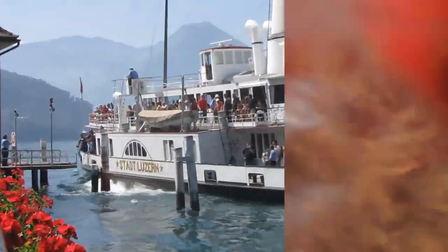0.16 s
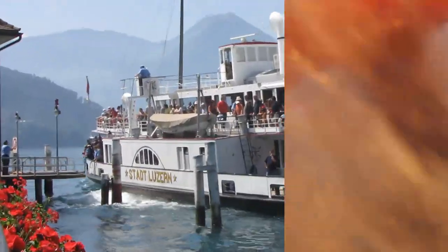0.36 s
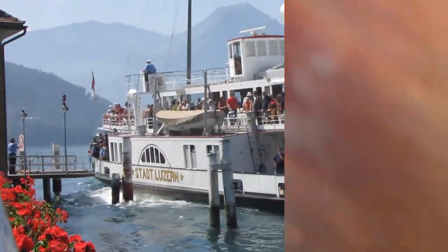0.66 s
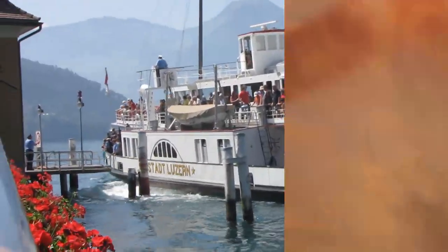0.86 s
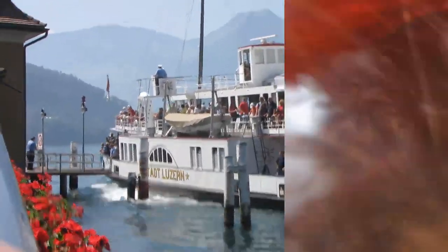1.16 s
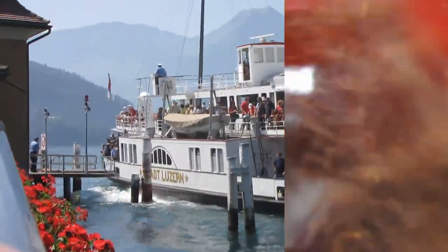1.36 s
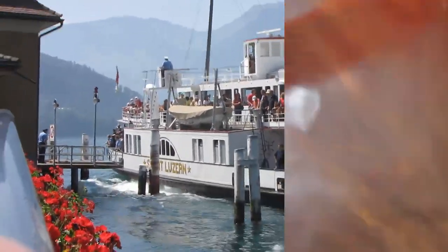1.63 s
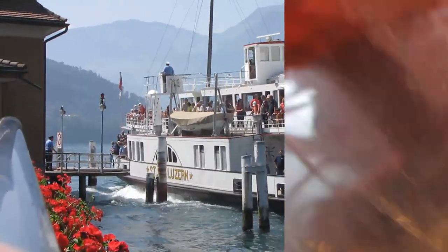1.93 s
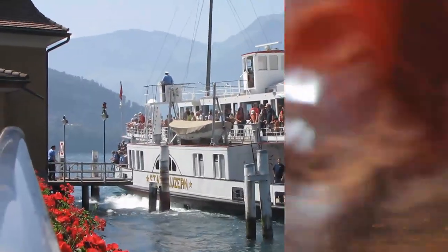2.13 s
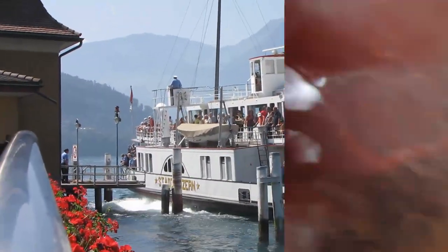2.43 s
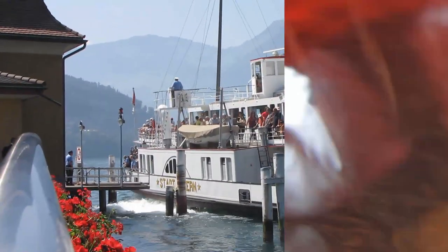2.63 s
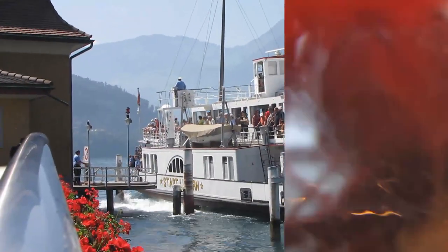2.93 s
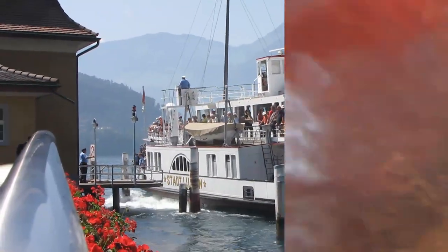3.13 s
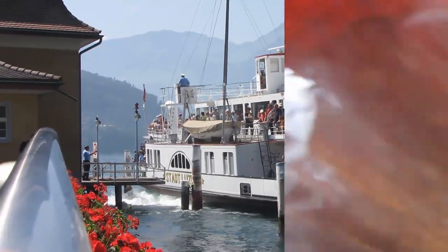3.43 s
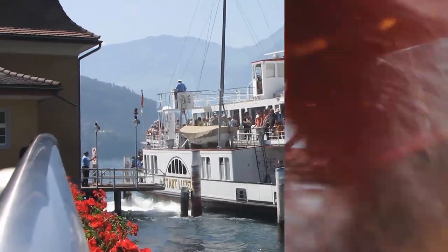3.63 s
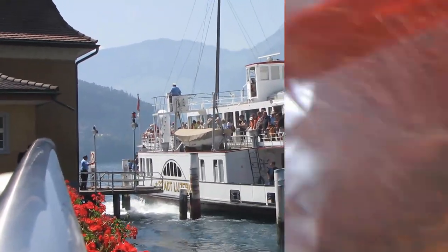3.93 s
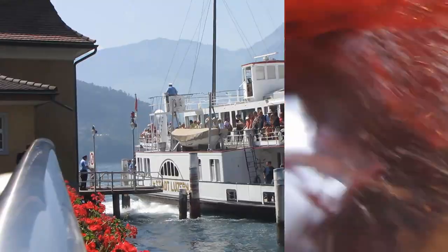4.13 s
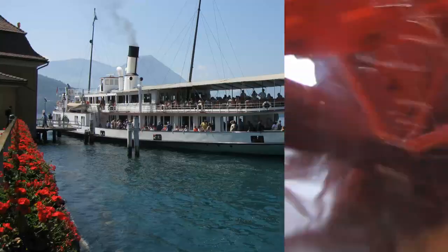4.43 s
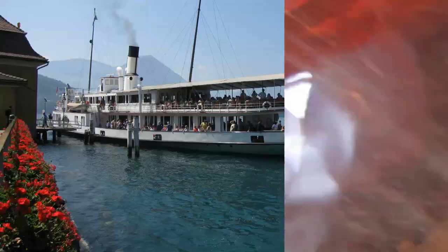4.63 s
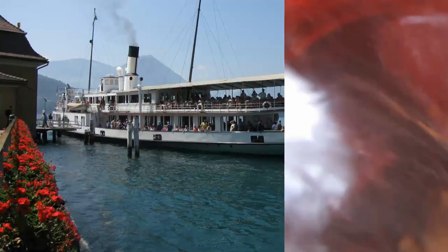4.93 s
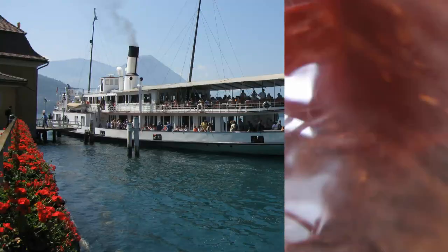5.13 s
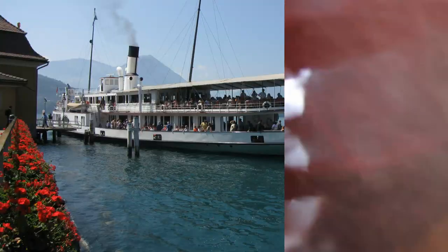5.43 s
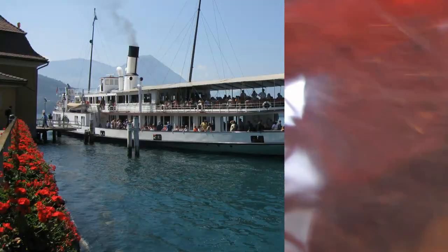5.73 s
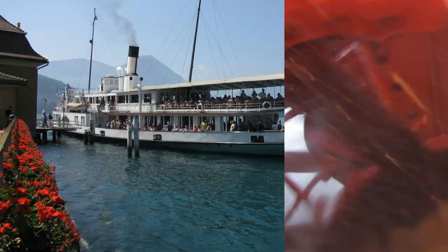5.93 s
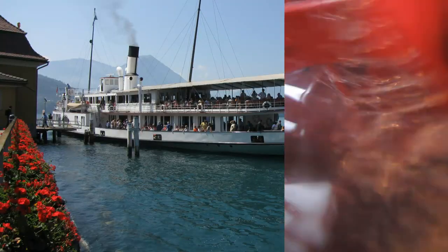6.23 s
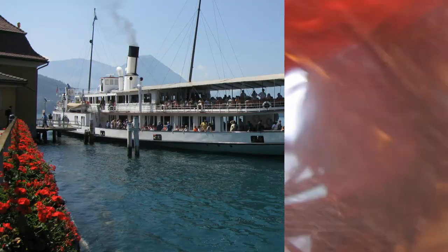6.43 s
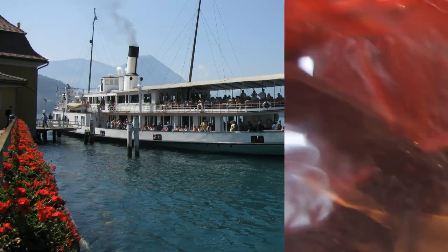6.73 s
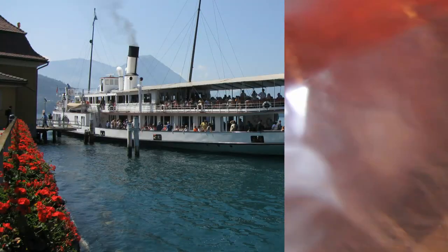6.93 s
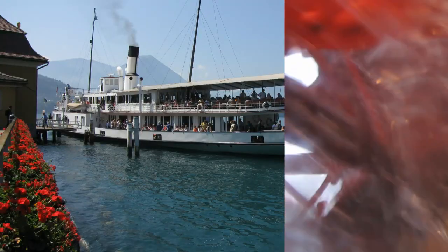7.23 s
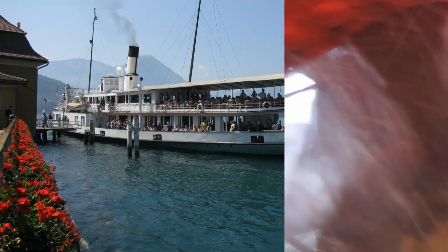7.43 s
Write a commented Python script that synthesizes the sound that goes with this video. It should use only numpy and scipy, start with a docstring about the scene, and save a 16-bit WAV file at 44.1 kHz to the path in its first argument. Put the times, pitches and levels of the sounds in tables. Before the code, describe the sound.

Paddle steamer wheels work the water beside a pier: a broad dense roar of foam, low gulps and fine spray, sinking to near silence.

```python
"""Beside a lake pier: a paddle steamer works its wheels, heard across open water on two close microphones.
The floats pound the lake, as deep noise, and trapped air gulps, as low bubbles in a blur of noise.
Smaller bubbles churn, splash and plink, fine drops hiss, and short bursts of bright noise slap.
The machinery drones faintly beneath as resonant noise; towards the end everything dies away."""
import sys
import numpy as np
from scipy import signal
from scipy.fft import rfft, irfft, next_fast_len
from scipy.io import wavfile
from scipy.ndimage import uniform_filter1d

SR = 44100
rng = np.random.default_rng(int(sys.argv[2]) if len(sys.argv) > 2 else 0)


def unload_audio(sound):
    """Save the sound as a 16-bit wav file, at the path given as the first command line argument."""
    columns = np.transpose(np.atleast_2d(sound))
    # keep every value between -1 and 1, then stretch to whole-number steps
    steps = np.round(np.clip(columns, -1, 1) * 32767)
    wavfile.write(sys.argv[1], SR, steps.astype(np.int16))


N = 333837

# strength of the wash, which drives all the water but the slaps; it holds, then dies away: (time [s], level [dB])
WASH_LEVEL = [(0, -22.5), (.75, -23.5), (1.25, -23), (1.7, -22.5), (2.55, -23), (3.2, -22.4), (3.95, -23.5),
              (4.8, -22.5), (5.3, -22), (5.7, -23.5), (6.05, -26.5), (6.3, -28.9), (6.85, -32), (7.17, -35),
              (7.38, -39), (7.57, -45.5)]
# brief uneven swells and dips of the wash, each part rising or sinking by its own dB:
# (time of middle [s], half length [s], pounding [dB], gulping [dB], churn [dB], splash [dB], spray [dB])
SWELLS_AND_DIPS = [(0.15, 0.18, 0, 1, 1.5, 0.2, 0.5), (0.258, 0.12, 5.5, 1.5, 0, 0, 0.5),
                   (0.495, 0.16, -2, 2.5, -1.5, 1, 0.5), (0.588, 0.09, 2, 0.5, 2.5, 1, -1),
                   (0.91, 0.071, -1, 5.5, 0, 1, 3), (0.992, 0.091, 1.5, 2, 1.5, 1.5, 2),
                   (1.06, 0.075, 3, 1, -1.5, 1, 3), (1.16, 0.1, 2.5, 0.5, 0, -1.9, 0),
                   (1.447, 0.12, -3, 0, 0, 0, 1), (1.573, 0.13, -1.5, 0, 1.5, 0.7, 0),
                   (1.78, 0.1, 3.5, -2, -1, 0.3, 0), (1.93, 0.23, 5, 2, -0.8, 1.3, 0.5),
                   (2.122, 0.1, -1, -2.5, -0.5, 1.2, 1.3), (2.25, 0.1, -4, 3.5, 2, 1, 1.2),
                   (2.76, 0.19, 2, 1, 0.5, -0.3, 1), (2.94, 0.22, 4, -1.5, 0.5, -0.5, 0.8),
                   (3.124, 0.077, -3, 1, -1, 1.3, 1.8), (3.268, 0.13, 1.5, 1.5, 2.5, 1, 0.5),
                   (3.674, 0.18, -1, 0.5, 0, 0, 0.5), (4.093, 0.13, 2, 0, -0.5, 0.5, 0),
                   (4.28, 0.099, -1.5, 3.5, 1.5, 1, 0.5), (4.435, 0.16, 1, 3.5, 2, 0.5, 0.2),
                   (4.728, 0.087, 1, 0, 2.5, 0, 0.5), (4.92, 0.17, -2, -0.5, 1, 0.5, 0.3),
                   (5.103, 0.07, 10, 1, 1, 1, 0.5), (5.27, 0.16, 3, 3, 1, 0.6, 1),
                   (5.645, 0.19, 3, 2, 0, 0.5, -0.3), (6.472, 0.14, 3, 3.5, -2, 1, 0),
                   (7.158, 0.18, 2, 2, 5, 1, 0)]

# colour of each part of the wash: (frequency [Hz], relative density [dB per Hz])
POUNDING_COLOUR = [(12, -30), (22, -7), (33, -2.5), (48, 1.5), (76, 0.7), (95, 0), (125, 2.5), (160, -1.5),
                   (205, -23)]
GULPING_COLOUR = [(115, -15), (150, 0.5), (200, 3), (232, 0.5), (268, 2.1), (295, 0.9), (322, 1.5),
                  (365, -3.5), (460, -14)]
CHURN_COLOUR = [(340, -8), (410, 1), (520, 2.5), (620, 3.5), (790, 2.5), (960, -3.5), (1150, -33)]
SPLASH_COLOUR = [(860, -10.5), (1020, -3.5), (1400, -3), (1900, -5), (2500, -6), (2900, -9.5), (3700, -16)]
SPRAY_COLOUR = [(2400, -16), (2850, -5), (3150, 0.2), (3450, -3), (3780, 0.4), (4150, -1.8), (4900, -0.3),
                (6200, -2.9), (8000, -7), (9300, -8.6), (10500, -11)]

# deep pounding and mid-range churn against the wash: (time [s], level [dB])
POUNDING_LEVEL = [(0, -5.5), (1.9, -5.5), (2.35, -6), (2.8, -6), (3.7, -5.5), (4.1, -7.5), (4.8, -14),
                  (5.3, -12), (6.1, -11.5), (7.57, -9)]
CHURN_LEVEL = [(0, -3), (2.1, -2), (2.6, -5.5), (3.4, -3), (3.95, -3), (4.4, -1.8), (5.2, -3.5), (6.2, -2),
               (7.57, -4)]
# other parts against the wash [dB]; plinks against the short splashes [dB]
GULPING_DB, SPLASH_DB, SPRAY_DB, PLINKS_DB = -3, -0.84, -5, -1
GULPING_EASE_DB_PER_S = 0.18   # gulping eases off as the wheels go on
SPRAY_FOLLOWS = 1.24   # spray grows faster than the wash that throws it [dB per dB]

# deepest gulps against the rest: (frequency [Hz], share [0-1]), then (time [s], level [dB])
DEEP_GULP_BAND = [(180, 1), (230, 0)]
DEEP_GULP_LEVEL = [(0, -2.5), (1.1, 2.5), (2.4, -1), (3.3, 1), (4.0, 2), (5.3, -1.8), (6.2, 1), (7.57, 1)]
# churn and splash around 1 kHz: (frequency [Hz], share [0-1]), then (time [s], level [dB])
MIDDLE_BAND = [(700, 0), (880, 1), (1150, 1), (1450, 0)]
MIDDLE_LEVEL = [(0, 1.1), (1.2, -1.3), (2.7, -0.7), (3.8, -0.1), (5.3, 0.6), (6.5, 2), (7.57, 0.5)]
# finest, highest spray: (frequency [Hz], share [0-1]), then (time [s], level [dB])
FINE_SPRAY_BAND = [(5500, 0), (8500, 1)]
FINE_SPRAY_LEVEL = [(0, 0), (1.2, -0.1), (2.5, -0.5), (3.2, 0.2), (4.0, -0.2), (5.3, -0.5), (7.57, -1.2)]

# sharp little slaps of water, peak taken ahead of the microphones:
# (time [s], peak level [dB], centre [Hz], bandwidth [Hz], decay time constant [s])
SLAPS = [(.221, -18, 5800, 4500, .0015), (.332, -19, 6300, 4000, .0015), (.372, -10.5, 3500, 4000, .0035),
         (3.12, -18, 6700, 2200, .003), (3.648, -16.5, 3800, 2400, .003), (4.384, -11.5, 3450, 1100, .0016)]
# hull resonances: (frequency [Hz], width of each filter pass [Hz], relative level [dB])
HULL_RESONANCES = [(93.6, 22, -2.5), (205.5, 8.5, -11), (268.7, 13, -7), (362, 27, -7.5), (862, 120, -4.5)]
# loudness of the machinery: (time [s], level [dB])
DRONE_LEVEL = [(0, -30), (3.9, -44), (4.4, -30), (5.3, -33), (5.9, -37), (6.5, -38.5), (7.2, -52),
               (7.57, -66)]
# the two microphones: (frequency [Hz], coherence [0-1], left-right balance [dB], left phase lead [rad])
MICROPHONES = [(30, 0.985, -0.4, 0.04), (60, 0.985, -0.7, 0.04), (125, 0.995, -0.2, 0.02),
               (220, 0.997, -0.1, 0.01), (290, 0.995, -0.2, 0.0), (400, 0.978, -0.3, -0.01),
               (600, 0.963, -0.4, -0.01), (850, 0.895, -0.4, 0.0), (1150, 0.87, -1.2, -0.04),
               (1400, 0.79, -1.3, -0.13), (1800, 0.69, -3.2, -0.26), (2350, 0.61, -6.4, -0.17),
               (2900, 0.35, -3.7, 0.2), (3500, 0.24, -1.3, 0.15), (3900, 0.39, 1.6, -0.25),
               (4400, 0.47, 3.2, -0.68), (5000, 0.42, 1.3, -0.9), (5800, 0.24, -0.5, -1.4),
               (7500, 0.29, -0.4, -2.3), (9800, 0.28, -0.5, -3.0)]
RECORDER_BAND_HZ, CUTOFF_HZ = 10350, 15600


def wash():
    """Strength of the wash in dB, and how far it lies from its median."""
    wash_db, = in_time(WASH_LEVEL)
    return wash_db, wash_db - np.median(wash_db)


def swells_and_dips():
    """Smooth humps and hollows in dB for pounding, gulping, churn, splash and spray."""
    t = np.arange(N) / SR
    total_db = np.zeros((5, N))
    for s, half_length, *changes_db in SWELLS_AND_DIPS:
        phase = np.clip((t - s) / half_length, -1, 1)
        hump = np.cos(np.pi / 2 * phase) ** 4
        total_db += np.outer(changes_db, hump)
    return total_db


def pounding(wash_db, change_db):
    """The floats pound the lake: a deep noise held steady, then shaped by the wash."""
    level_db = wash_db + in_time(POUNDING_LEVEL)[0] + change_db
    noise = coloured(rng.standard_normal((2, N)), POUNDING_COLOUR)
    return from_db(level_db) * steadied(noise, seconds=0.12)


def gulping(wash_db, change_db):
    """Big pockets of trapped air gulp as low bubbles that ring long."""
    t = np.arange(N) / SR
    level_db = wash_db + GULPING_DB - GULPING_EASE_DB_PER_S * t + change_db
    pockets = bubbles(GULPING_COLOUR, cycles=38, rise=0.098, spread_db=3.5, count=1500)
    gulps = white_water(GULPING_COLOUR, pockets, grain_db=-7, steady_s=0.135)
    return from_db(level_db) * swelled(gulps, DEEP_GULP_BAND, DEEP_GULP_LEVEL)


def churn(wash_db, change_db):
    """Clouds of mid-sized bubbles churn, each climbing clearly in pitch."""
    level_db = wash_db + in_time(CHURN_LEVEL)[0] + change_db
    cloud = bubbles(CHURN_COLOUR, cycles=36, rise=0.35, spread_db=3, count=3000)
    return from_db(level_db) * white_water(CHURN_COLOUR, cloud, grain_db=-8, steady_s=0.14)


def splash(wash_db, change_db):
    """Thrown water falls back as brief bubbles, with long-ringing ones that plink among them."""
    level_db = wash_db + SPLASH_DB + change_db
    short = bubbles(SPLASH_COLOUR, cycles=6.0, rise=0.076, spread_db=2.0, count=8000)
    plinks = bubbles(SPLASH_COLOUR, cycles=60, rise=0.05, spread_db=3.5, count=2000)
    grains = short + from_db(PLINKS_DB) * plinks
    return from_db(level_db) * white_water(SPLASH_COLOUR, grains, grain_db=-7, steady_s=0.15)


def spray(wash_db, swing_db, change_db):
    """Fine drops hiss as a crowd of tiny, very short rings."""
    level_db = wash_db + SPRAY_DB + (SPRAY_FOLLOWS - 1) * swing_db + change_db
    drops = bubbles(SPRAY_COLOUR, cycles=4, rise=.05, spread_db=2.1, count=55000)
    return from_db(level_db) * white_water(SPRAY_COLOUR, drops, grain_db=-3, steady_s=0.4)


def paddle_wash():
    """The wheels drive all five parts from one strength, each with its own brief swells and dips."""
    wash_db, swing_db = wash()
    pounding_db, gulping_db, churn_db, splash_db, spray_db = swells_and_dips()
    under_water = pounding(wash_db, pounding_db) + gulping(wash_db, gulping_db)
    sheets = drift(17.0)   # falling sheets of water lift splash and spray together
    falling = splash(wash_db, splash_db) * from_db(0.34 * sheets)
    hiss = spray(wash_db, swing_db, spray_db) * from_db(0.42 * sheets)
    body = swelled(churn(wash_db, churn_db) + falling, MIDDLE_BAND, MIDDLE_LEVEL)
    return under_water + body + swelled(hiss, FINE_SPRAY_BAND, FINE_SPRAY_LEVEL)


def slaps():
    """A slap is a short decaying burst of bright noise, put only in the part both microphones share."""
    out, age = np.zeros((2, N)), np.arange(int(.05 * SR)) / SR
    for s, peak_db, hz, width_hz, decay_s in SLAPS:
        edges = [hz - width_hz / 2, hz + width_hz / 2]
        band = signal.butter(2, edges, "band", fs=SR, output="sos")
        burst = rng.standard_normal(len(age)) * np.exp(-age / decay_s)
        crack = signal.sosfilt(band, burst)
        at = int(s * SR)
        out[0, at:at + len(age)] += from_db(peak_db) * crack / abs(crack).max()
    return out


def machinery():
    """The engine keeps a few hull resonances humming unevenly: noise through narrow peaks."""
    hum = 0
    for hz, width_hz, level_db in HULL_RESONANCES:
        b, a = signal.iirpeak(hz, hz / width_hz, fs=SR)
        once = signal.lfilter(b, a, rng.standard_normal((2, N + SR)))
        shaken = signal.lfilter(b, a, once)[:, SR:]   # drop the first second, while the ringing builds
        hum = hum + from_db(level_db) * steadied(shaken, seconds=0.3)
    return from_db(in_time(DRONE_LEVEL)[0]) * rms_one(hum)


def microphone(field):
    """Two close microphones hear the bass alike; in the treble they differ and the left mostly lags."""
    coherence, balance_db, lead = in_frequency(MICROPHONES)
    alike = np.clip(coherence, 0, .999)
    left = from_db(balance_db / 2) * np.exp(.5j * lead)
    right = from_db(-balance_db / 2) * np.exp(-.5j * lead)
    common = np.sqrt(1 + alike) * np.array([left, right])
    apart = np.sqrt(1 - alike) * np.array([left, -right])
    # the sum of both microphones keeps its colour
    centre = np.hypot(abs(common.mean(axis=0)), abs(apart.mean(axis=0)))
    return filtered(field[0], common / centre) + filtered(field[1], apart / centre)


def bubbles(spectrum, cycles, rise, spread_db, count):
    """Bubbles born at random: dying sines whose pitch climbs as they near the surface; two rows, rms 1."""
    when, pitch, size, side = rng.random((count, 4)).T[:, :, None]
    low, high = spectrum[0][0], spectrum[-1][0]
    hz = low * (high / low) ** pitch
    age = np.arange(int(cycles * SR / low))   # in samples
    life = age * hz / (SR * cycles)   # 1 where the ring has fallen by 60 dB
    height = hz * from_db(-spread_db * np.log(np.maximum(size, .01)))   # many faint ones, a few strong
    phase = 2 * np.pi * cycles * life * (1 + rise * life / 2)
    rings = height * np.exp(-np.log(1000) * life) * np.sin(phase)
    at = ((when * N).astype(int) + age).ravel()
    rows = []
    for share in (np.cos, np.sin):
        part = rings * share(2 * np.pi * side)
        rows.append(np.bincount(at, part.ravel(), N)[:N])
    return rms_one(np.array(rows))


def white_water(spectrum, grains, grain_db, steady_s):
    """Single bubbles stand out of a noise blur of countless others; power held steady."""
    blur = coloured(rng.standard_normal((2, N)), spectrum)
    return steadied(blur + from_db(grain_db) * coloured(grains, spectrum), steady_s)


def steadied(x, seconds):
    """Even out x so that the power of its first row holds over a short span."""
    power = uniform_filter1d(x[0] ** 2, max(int(seconds * SR), 1))
    return x / np.sqrt(power + 1e-9)


def swelled(x, band, curve):
    """Let one band of x, given as (frequency [Hz], share [0-1]), rise and sink along a curve in dB."""
    return x + (from_db(in_time(curve)[0]) - 1) * filtered(x, in_frequency(band)[0])


def drift(rate):
    """Slow chance with spread 1: noise through two equal low-pass poles at rate Hz."""
    r = np.exp(-80 * np.pi * rate / SR)   # drawn at every 40th sample
    noise = rng.standard_normal(N // 40 + 2002)
    slow = signal.lfilter([1], [1, -2 * r, r * r], noise)[2000:]
    return np.interp(np.arange(N) / 40, np.arange(len(slow)), rms_one(slow))


def coloured(x, spectrum):
    """Give x a spectrum that sinks to -90 dB an octave beyond its ends; rms 1."""
    closed = [(spectrum[0][0] / 2, -90), *spectrum, (spectrum[-1][0] * 2, -90)]
    return rms_one(filtered(x, from_db(in_frequency(closed)[0])))


def filtered(x, gain):
    """Apply a gain per Fourier bin."""
    size = next_fast_len(N)
    return irfft(rfft(x, size) * gain, size)[..., :N]


def in_time(rows):
    """Each column of a curve at every sample."""
    s, *columns = np.transpose(rows)
    return [np.interp(np.arange(N) / SR, s, c) for c in columns]


def in_frequency(rows):
    """Each column of a spectrum at every Fourier bin, joined along log frequency."""
    hz, *columns = np.transpose(rows)
    bins = np.maximum(np.fft.rfftfreq(next_fast_len(N), 1 / SR), 1)
    return [np.interp(np.log(bins), np.log(hz), c) for c in columns]


def rms_one(x):
    """Scale to unit rms."""
    return x / np.sqrt(np.mean(x ** 2) + 1e-20)


def from_db(db):
    """Decibels to gain."""
    return 10 ** (np.asarray(db) / 20)


def scene():
    """The wash, its slaps and the ship's drone reach the microphones across the water."""
    return microphone(paddle_wash() + slaps() + machinery())


def record(dry):
    """Every second sample, joined by straight lines, mirrors a faint sheen into the top, then cut steeply."""
    band_limit = signal.ellip(12, .1, 80, RECORDER_BAND_HZ, fs=SR, output="sos")
    kept = signal.sosfilt(band_limit, dry)[:, ::2]
    joined = np.array([np.interp(np.arange(N), np.arange(0, N, 2), channel) for channel in kept])
    top_cut = signal.ellip(12, .1, 90, CUTOFF_HZ, fs=SR, output="sos")
    return signal.sosfilt(top_cut, joined)


dry = scene()
out = record(dry)
unload_audio(out)
```